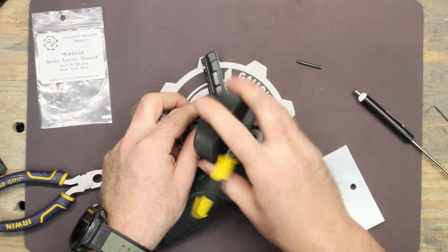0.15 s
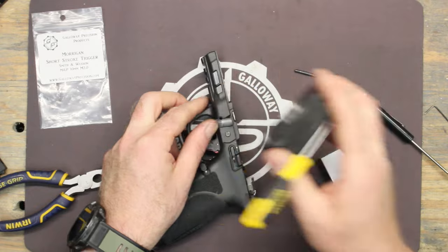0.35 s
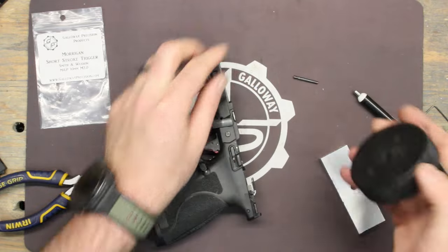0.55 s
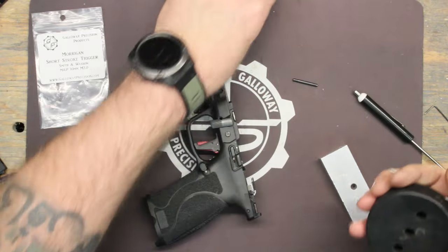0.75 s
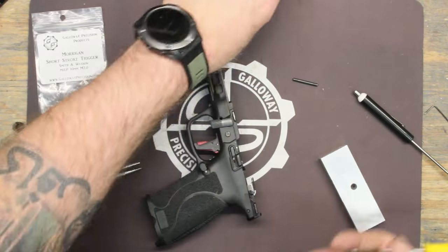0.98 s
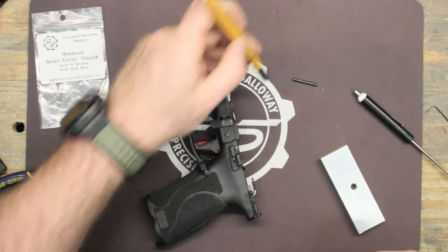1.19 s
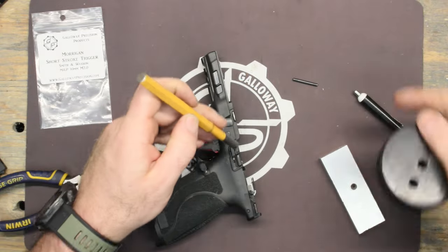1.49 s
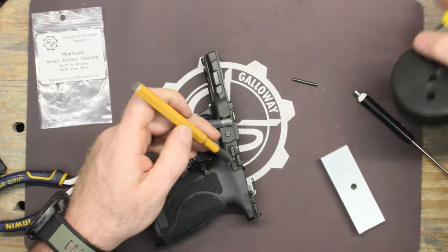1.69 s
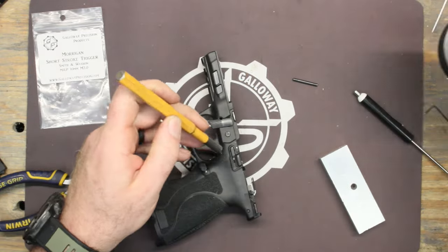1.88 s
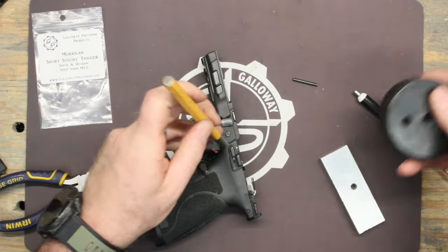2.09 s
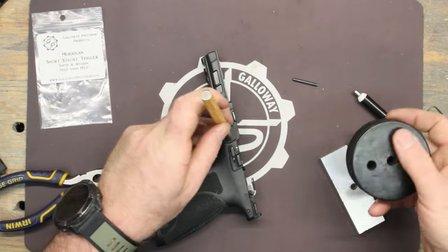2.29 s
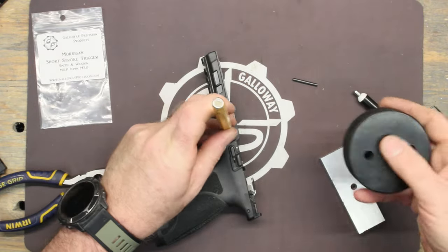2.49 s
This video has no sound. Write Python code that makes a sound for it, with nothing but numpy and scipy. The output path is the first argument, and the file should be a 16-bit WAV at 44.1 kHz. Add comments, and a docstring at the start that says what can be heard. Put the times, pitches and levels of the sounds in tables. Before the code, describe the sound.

Hard punch taps on a steel pin: an earlier blow dies away at the start, then a loud, clipped crack at 0.25 s with a thin metallic ring. Small clicks near 0.5, hiss swelling after 0.7, a hand sliding on the mat with soft thuds around 1.0, a thud at 1.74. A loud knock at 1.94 bounces duller until 2.35, ending with bright steel clicks near 2.4; faint fan, short room tail.

```python
"""Small workshop, wooden bench: a punch is tapped hard on a steel pin in a pistol frame, near an overloading mic.
A hand slides over the mat, tools are set down, a hard rubber puck knocks and bounces, steel parts click.
Contacts are filtered noise bursts with a room tail, most with damped sine modes.
Faint fan, whine, slide and a varying background hiss are shaped noise; loud hits duck the gain and clip."""
import sys
import numpy as np
from scipy import signal
from scipy.fft import rfft, irfft, next_fast_len
from scipy.io import wavfile
from scipy.ndimage import uniform_filter1d

SR = 44100
rng = np.random.default_rng(int(sys.argv[2]) if len(sys.argv) > 2 else 0)


def unload_wav(signal):
    """Save mono or channel-first audio to the path in sys.argv[1] as 16-bit WAV at rate SR, clipped to [-1, 1]."""
    wavfile.write(
        sys.argv[1],
        SR,
        np.round(np.clip(np.atleast_2d(signal).T, -1, 1) * 32767).astype(np.int16),
    )


N = 116865
RING_S = 0.8  # every contact sound is cut off here


def amp(db):
    """Decibels to gain."""
    return 10 ** (np.asarray(db) / 20)


def unit(x):
    """Scale to rms 1."""
    return x / np.sqrt(np.mean(x ** 2) + 1e-20)


def along(points, hz):
    """Interpolate (Hz, value) points on a log frequency axis."""
    point_hz, values = np.transpose(points)
    return np.interp(np.log(hz + 1e-6), np.log(point_hz), values)


def level(rows):
    """Gain per sample from (s, dB) points."""
    return amp(np.interp(np.arange(N) / SR, *np.transpose(rows)))


def coloured(x, gain):
    """Causal minimum-phase filter with the given gain over frequency, by folding the cepstrum."""
    size = 2 * next_fast_len(len(x) // 2 + SR // 20)
    magnitude = np.maximum(gain(np.fft.rfftfreq(size, 1 / SR)), 1e-6)
    cepstrum = irfft(np.log(magnitude))
    cepstrum[1:size // 2] *= 2
    cepstrum[size // 2 + 1:] = 0
    response = np.exp(rfft(cepstrum))
    return irfft(rfft(x, size) * response, size)[:len(x)]


def noise(gain):
    """Steady coloured noise of rms 1."""
    return unit(coloured(rng.standard_normal(N), gain))


def low_cut(f, cut_hz):
    """Second-order high-pass gain, -3 dB at cut_hz."""
    return f ** 2 / np.hypot(f ** 2, cut_hz ** 2)


def add(track, start_s, sound):
    """Mix a sound in at a time, which may lie before the start."""
    i = round(start_s * SR)
    part = sound[max(-i, 0):N - i]
    track[max(i, 0):][:len(part)] += part


def age():
    """Time since a contact, in s."""
    return np.arange(int(RING_S * SR)) / SR


def ring(modes, wander_hz_per_khz=0):
    """Damped sine modes, levels varied per strike, pitch optionally wavering."""
    t = age()
    knots_s = np.arange(0, RING_S, 0.01)
    out = np.zeros(len(t))
    for k, (hz, db, t60_s) in enumerate(modes):
        waver = np.interp(t, knots_s, rng.standard_normal(len(knots_s)))
        drift = np.cumsum(waver) / SR
        phase = hz * t + wander_hz_per_khz * hz / 1000 * drift
        envelope = amp(db + rng.normal(0, 1) - 60 * t / t60_s)
        polarity = (-1) ** k
        out += polarity * envelope * np.sin(2 * np.pi * phase)
    return out


def burst(body, t60_at_0hz_s, room_db, treble_damping):
    """Dense modes of a body as decaying noise, the high ones dying first, plus the room's tail."""
    # room decay: hz, t60_s
    room = [(100, 0.62), (400, .42), (1200, 0.42), (3000, 0.41), (8000, 0.38), (16000, 0.26)]
    t = age()
    hz, s, z = signal.stft(rng.standard_normal(len(t)), SR, nperseg=128)
    body_t60_s = t60_at_0hz_s / (1 + hz[:, None] / 1000) ** treble_damping
    room_t60_s = along(room, hz)[:, None]
    body_fade = amp(-60 * s / body_t60_s)
    room_fade = amp(room_db - 60 * s / room_t60_s)
    fade = np.hypot(body_fade, room_fade)
    x = signal.istft(z * fade, SR, nperseg=128)[1][:len(t)]
    return coloured(x, lambda f: unit(amp(along(body, f))))


def contact(x, cut_hz, bass_db=0):
    """A softer contact leaves out the treble; a flatter one adds bass, bass_db at 0 Hz."""
    def gain(f):
        bass = amp(bass_db / (1 + (f / 600) ** 2))
        return bass / np.hypot(1, (f / cut_hz) ** 2)
    return coloured(x, gain)


def workshop():
    """Fan noise with one narrow resonance, and a thin high whine of narrow-band noise."""
    # fan spectrum ahead of the low cut: hz, relative_db
    fan_colour = [(15, 7), (25, -15), (178, -2), (246, -12.5), (340, 1.5), (495, -15), (666, -15),
                  (945, -20), (1110, -2), (1490, -17.5), (1660, -20), (1900, -19), (8810, -29),
                  (10100, -29.5), (15500, -46)]

    def band(hz, half_width_hz):
        return noise(lambda f: 1 / (1 + ((f - hz) / half_width_hz) ** 2))
    fan = amp(-46) * noise(lambda f: amp(along(fan_colour, f)) * low_cut(f, cut_hz=42))
    resonance = amp(-57.5) * band(1108, half_width_hz=47)
    whine = amp(-61.5) * band(9960, half_width_hz=76)
    return fan + resonance + whine


def background_hiss():
    """Shaped noise, low after the hard tap, swelling back with brief brushes, then fading."""
    # level of the hiss: time_s, level_db
    hiss_level = [(0, -82), (.58, -67), (.72, -46), (1.05, -47.5), (1.09, -36.5), (1.17, -42.5),
                  (1.245, -38), (1.29, -43), (1.5, -49.5), (1.9, -55), (2.65, -60)]
    # hiss spectrum: hz, relative_db
    hiss_colour = [(880, -29), (1500, -2), (2070, -3.5), (3440, -1.5), (4390, -3.5), (7520, -6.5),
                   (15500, -13)]
    return level(hiss_level) * noise(lambda f: amp(along(hiss_colour, f)))


def slide():
    """A hand slides over the mat: friction as shaped noise."""
    # level of the slide: time_s, level_db
    slide_level = [(.92, -45.5), (.945, -31), (.975, -28.5), (1.02, -35), (1.09, -37.5), (1.16, -44.5)]
    # slide spectrum: hz, relative_db
    slide_colour = [(30, -29), (150, 3), (500, -1.5), (1000, -5), (2500, -14), (6000, -23.5), (16000, -41)]
    return level(slide_level) * noise(lambda f: amp(along(slide_colour, f)))


def thuds():
    """Things set on the mat: padded bursts with one short low note; the heavy bench top sways."""
    # soft thuds: start_s, level_db, pitch_hz, t60_s (burst: at 0 Hz)
    thud_rows = [(0.139, -36.5, 349, 0.2), (0.199, -34.5, 298, 0.13), (.983, -30, 477, 0.17),
                 (1.027, -19.5, 418, 0.13), (1.741, -17.5, 225.7, 0.11), (1.763, -25, 281, .14),
                 (1.931, -25, 320, 0.077), (2.392, -25, 157, 0.16)]
    # thud spectrum: multiple_of_pitch, relative_db
    thud_body = [(.1, -25), (.5, -9), (1, 1), (1.8, -6.5), (3.5, -25.5), (10, -36), (40, -62)]
    # bench sways: start_s, level_db (ahead of the slow rise)
    sway_rows = [(.845, -37), (.94, -28), (1.741, -25), (2.392, -32)]
    sway_hz, sway_t60_s, sway_rise_s = 57, 0.22, 0.0085
    out = np.zeros(N)
    for start_s, db, hz, t60_s in thud_rows:
        body = [(k * hz, gain_db) for k, gain_db in thud_body]
        pad = amp(1.5) * burst(body, t60_s, room_db=-13.5, treble_damping=0.6)
        note = ring([(hz, 0, t60_s)])
        add(out, start_s, amp(db) * (pad + note))
    for start_s, db in sway_rows:
        rise = 1 - np.exp(-age() / sway_rise_s)
        sway = ring([(sway_hz, 0, sway_t60_s)]) * rise
        add(out, start_s, amp(db) * sway)
    return out


def ticks():
    """Contacts too short to ring, noise only: cracks of hard hits, ticks and rattles of small parts."""
    # cracks opening the hardest contacts: start_s, level_db, t60_at_0hz_s
    crack_rows = [(0.2479, 1.5, 0.02), (1.9433, 19, 0.022)]
    # crack spectrum: hz, relative_db
    crack_body = [(30, -7.5), (300, 0.5), (1500, -1), (3000, 3), (6000, -35.5), (16000, -22.5)]
    # light ticks of loose parts: start_s, level_db, centre_hz
    tick_rows = [(.069, -53, 10100), (.138, -59, 12000), (.196, -48, 10000), (.264, -26, 7000),
                 (.286, -35, 8000), (0.315, -21, 8950), (.4755, -22, 7500), (.498, -33, 8150),
                 (1.025, -40, 11800), (1.068, -28.5, 2180), (1.7391, -28, 1430), (1.93, -28.5, 3130),
                 (1.954, -14, 6600), (2.0768, -17, 5500), (2.101, -45, 11000), (2.1989, -19.5, 4480),
                 (2.242, -32, 7950), (2.336, -38, 4200), (2.265, -31, 11000), (2.60, -39, 2190)]
    # tick spectrum: multiple_of_centre, relative_db
    tick_body = [(.05, -32), (.3, 10), (.7, -2), (1, 3.5), (1.5, -9.5), (3, -27.5), (10, -31)]
    out = np.zeros(N)
    for start_s, db, t60_s in crack_rows:
        crack = burst(crack_body, t60_s, room_db=-32, treble_damping=0.34)
        add(out, start_s, amp(db) * crack)
    for start_s, db, hz in tick_rows:
        body = [(k * hz, gain_db) for k, gain_db in tick_body]
        tick = burst(body, t60_at_0hz_s=0.055, room_db=-21, treble_damping=0.13)
        add(out, start_s, amp(db) * tick)
    return out


def clicks():
    """Steel on steel: a sharp burst and a short bright ring; light parts lack the low modes."""
    # clicks: start_s, level_db, contact_cutoff_hz, low_cut_hz, ring_db
    click_rows = [(.471, -40, 5100, 2800, -28), (0.4741, -21, 7000, 2800, -25),
                  (.4978, -21.5, 7500, 2800, -23), (1.068, -25.5, 6000, 700, -32),
                  (1.077, -24.5, 12000, 1200, -32), (2.218, -10, 8250, 2520, -28),
                  (2.3629, -5, 4370, 900, -26), (2.392, 2, 13400, 675, -18)]
    # burst spectrum: hz, relative_db
    click_body = [(30, -18), (1150, -15.5), (1400, 0), (1800, -4), (2400, -3), (2750, 0), (3350, 2.5),
                  (3900, -4.5), (4800, -5.5), (6000, -8.5), (8500, -9.5), (11500, -17), (14000, -18.5),
                  (16000, -30)]
    # steel modes: hz, relative_db, t60_s
    click_modes = [(1293, -20, 0.11), (1420, -16, 0.12), (2110, -11.5, 0.26), (2870, -11, .25),
                   (3060, -9, 0.29), (3310, -4, 0.28), (3346, -5, 0.18), (3445, -7, 0.25), (3470, -3, 0.28),
                   (3630, -13, 0.22), (4930, -14, .3), (5700, -9, 0.26)]
    wander_hz_per_khz = 9.1  # random pitch waver that roughens the steel ring
    out = np.zeros(N)
    for start_s, db, cut_hz, low_hz, ring_db in click_rows:
        crack = burst(click_body, t60_at_0hz_s=0.053, room_db=-23.5, treble_damping=0.34)
        steel = amp(ring_db) * ring(click_modes, wander_hz_per_khz)
        click = contact(crack + steel, cut_hz)
        add(out, start_s, amp(db) * coloured(click, lambda f: low_cut(f, low_hz)))
    return out


def knocks():
    """The puck lands on the bench and bounces, broadly softer and duller: burst plus bench modes."""
    # knocks: start_s, level_db, contact_cutoff_hz, bass_db, t60_at_0hz_s
    knock_rows = [(1.9428, 4, 3170, 2, 0.033), (2.0758, 0.5, 2250, 4.5, 0.12), (2.198, -6, 2010, 6, 0.16),
                  (2.263, -13, 1090, 10.5, 0.18), (2.335, -12, 1370, 7.5, 0.2),
                  (2.380, -20, 820, 12.5, 0.12)]
    # burst spectrum: hz, relative_db
    knock_body = [(30, -27), (100, -14), (170, -9.5), (330, 2), (560, -3), (850, -4.5), (1130, 3.5),
                  (1550, 0.5), (1950, -9), (2450, -3), (3200, -23), (3900, -4.5), (5200, -18.5),
                  (8500, -14), (16000, -29)]
    # modes: hz, relative_db, t60_s
    knock_modes = [(168.6, -6.5, 0.5), (323, -4.5, .31), (462.6, -3, 0.43), (571, -5, 0.49),
                   (743, -7, 0.38), (1085, 8.5, 0.26), (1172, 10, 0.21), (1429, 13.5, 0.096),
                   (1470, 1, 0.44), (1654, -2, 0.4), (2012, 0.5, 0.21), (2370, -21, 0.23), (4100, -26, .28),
                   (6700, -4, 0.29)]
    out = np.zeros(N)
    for start_s, db, cut_hz, bass_db, t60_s in knock_rows:
        thump = burst(knock_body, t60_s, room_db=-9.5, treble_damping=0.15)
        modes = amp(-21.5) * ring(knock_modes)
        add(out, start_s, amp(db) * contact(thump + modes, cut_hz, bass_db))
    return out


def taps():
    """Each tap drives frame and bench; the punch sings on after the first, the pin after the last."""
    # hard taps, the first only dying away: start_s, level_db, contact_cutoff_hz
    tap_rows = [(-.118, 4.5, 4660), (0.2463, 11.5, 7400)]
    # dense response of frame on bench: hz, relative_db
    tap_body = [(30, -22.5), (90, -12), (200, -3.5), (500, -2), (1000, -8), (1800, -12.5), (3300, -18),
                (6000, -24), (10000, -25), (16000, -26.5)]
    # modes of frame on bench: hz, relative_db, t60_s
    tap_modes = [(204, 2, 0.19), (245.7, -0.5, 0.2), (284.2, -7.5, .45), (329.3, -3.5, 0.16),
                 (464.6, -1, 0.32), (525.5, -1, 0.35), (586.4, -0.5, 0.27), (658, -3, 0.27),
                 (821.4, 0.5, 0.11), (1042, -6.5, 0.32), (1890, -15, 0.3), (3520, -43, 0.33),
                 (4410, -22, 0.42), (6850, -28, .4), (8400, -27, 0.33), (12328, -30, .35)]
    # long ring of the steel punch: hz, level_db, t60_s
    punch_modes = [(2099, -43, 1.2), (4680, -53, 1.2), (4850, -45, 1.5), (9453, -45, .85),
                   (10185, -42, .75)]
    # long ring of the driven-in steel pin: hz, level_db, t60_s
    pin_modes = [(1340, -37.5, 1.8), (4830, -46, 1.9)]
    out = np.zeros(N)
    for start_s, db, cut_hz in tap_rows:
        blow = burst(tap_body, t60_at_0hz_s=0.11, room_db=-13.5, treble_damping=0.43)
        modes = amp(-15) * ring(tap_modes)
        add(out, start_s, amp(db) * contact(blow + modes, cut_hz))
    add(out, tap_rows[0][0], ring(punch_modes))
    add(out, tap_rows[-1][0], ring(pin_modes))
    return out


def scene():
    """All sources at the one microphone."""
    background = workshop() + background_hiss() + slide()
    small_contacts = thuds() + ticks() + clicks()
    return (background + small_contacts + knocks() + taps())[None]


def record(dry):
    """Loud hits turn the gain down for a moment, still clip, and the top is cut off."""
    duck_db, duck_above, recover_s, smooth_s = 11.5, 1, 0.25, 0.056  # depth ahead of smoothing
    clip_top, top_hz = 1.0, 16000
    t = np.arange(N) / SR
    loud = uniform_filter1d(np.abs(dry[0]), size=441) > duck_above  # 10 ms mean
    last_loud_s = np.maximum.accumulate(np.where(loud, t, -10))
    recovery = np.exp(-(t - last_loud_s) / recover_s)
    pole = np.exp(-1 / (smooth_s * SR))
    duck = signal.lfilter([1 - pole], [1, -pole], recovery)
    clipped = np.clip(dry[0] * amp(-duck_db * duck), -clip_top, clip_top)
    low_pass = signal.firwin(201, top_hz, fs=SR)
    return signal.fftconvolve(clipped, low_pass, "same")[None]


dry = scene()
out = record(dry)
unload_wav(out)
```